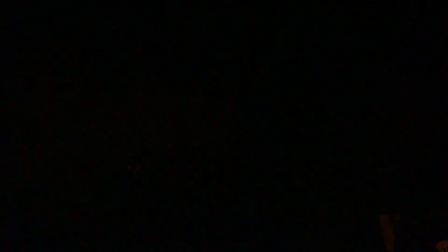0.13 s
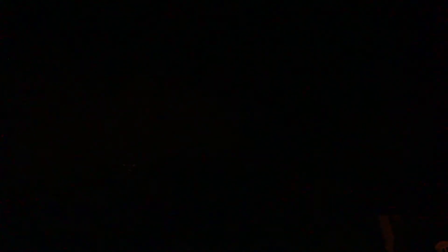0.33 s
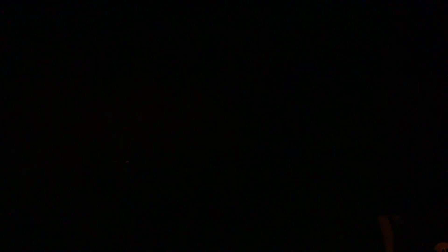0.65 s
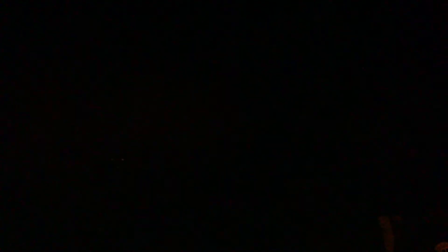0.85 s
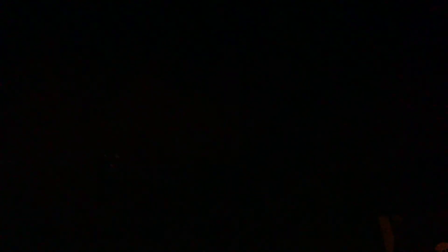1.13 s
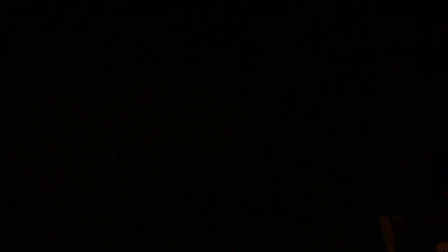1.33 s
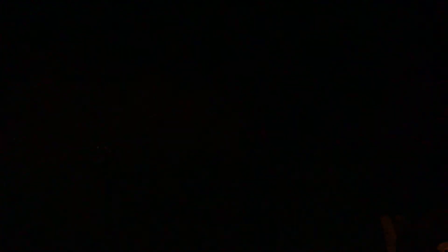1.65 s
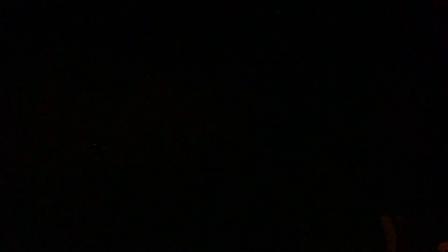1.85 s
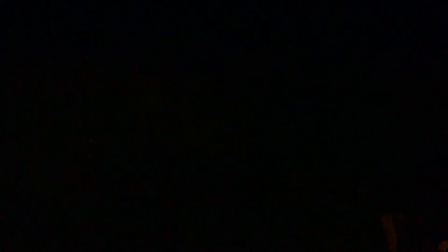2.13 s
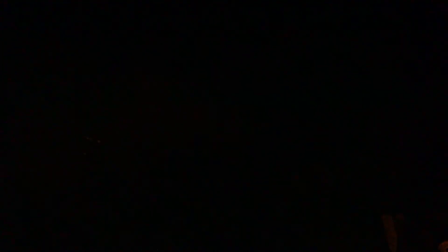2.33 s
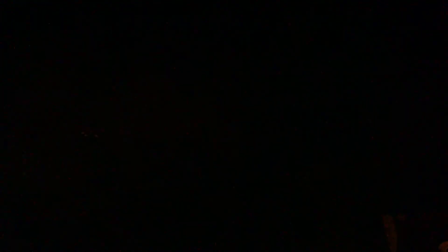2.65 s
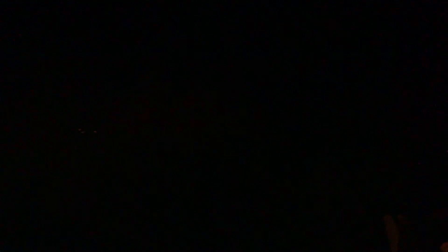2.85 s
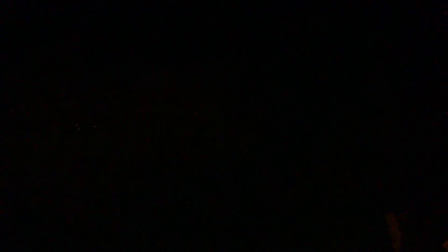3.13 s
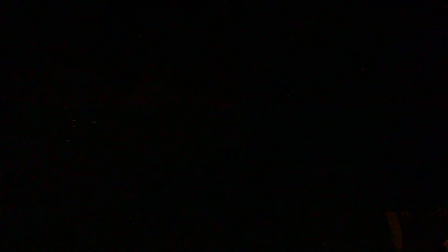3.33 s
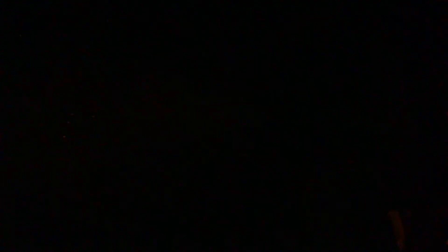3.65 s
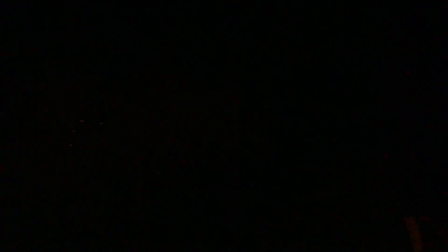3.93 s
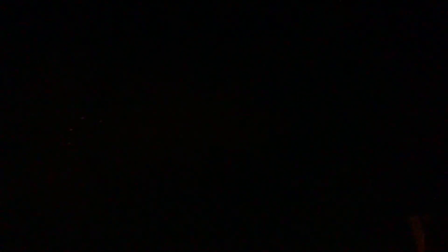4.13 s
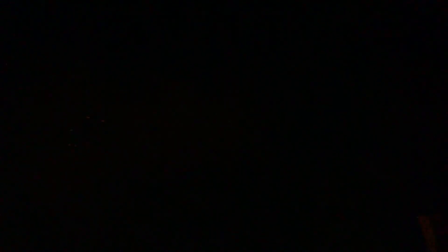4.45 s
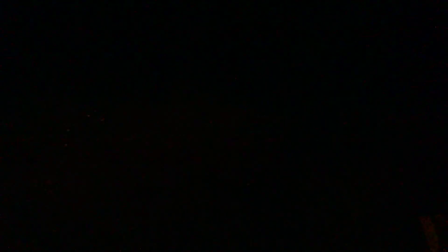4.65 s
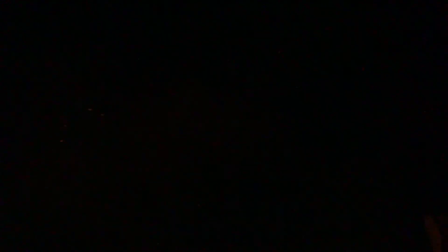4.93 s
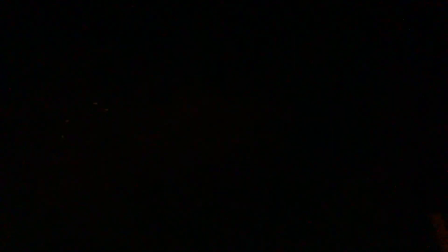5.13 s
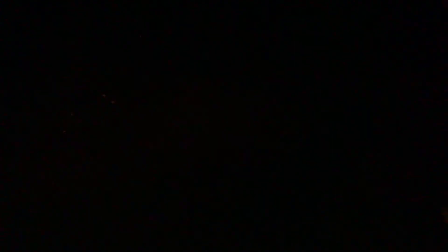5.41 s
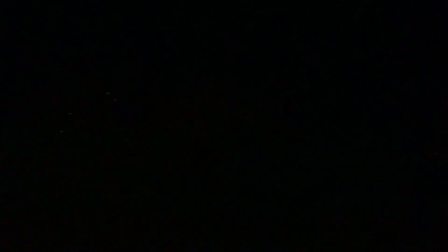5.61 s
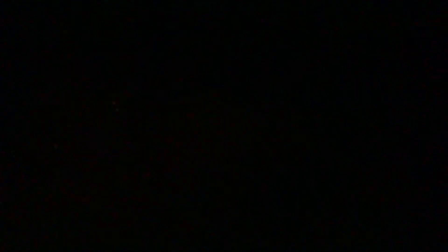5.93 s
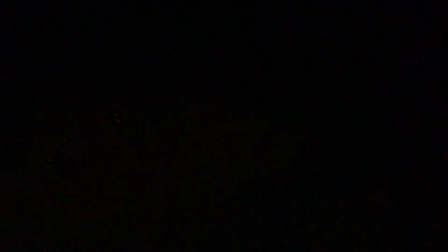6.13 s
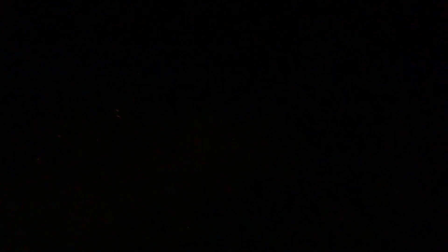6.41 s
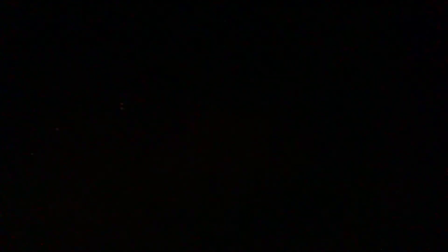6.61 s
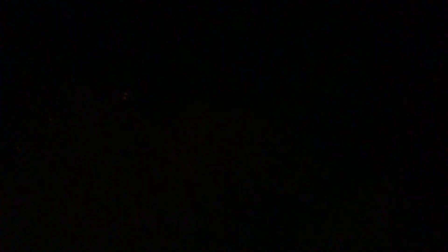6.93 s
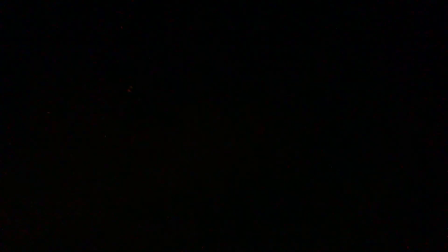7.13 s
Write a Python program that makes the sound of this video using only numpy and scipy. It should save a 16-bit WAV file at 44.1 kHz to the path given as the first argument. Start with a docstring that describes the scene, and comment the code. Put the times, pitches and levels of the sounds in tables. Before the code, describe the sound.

A dense gull flock is already calling at 0 s and never stops until the cut at about 7.4 s. Near birds give short mews, yelps and keening cries, roughly 0.05 to 0.25 s long, many scooping up slightly and then falling; lower nasal honks and gruff notes and hoarse pulsed squawks cut between them. Behind is a dulled, uneven clamour of far birds, with a diffuse echo from house fronts lasting over half a second. A soft town hum with microphone hiss stays beneath; a treble hiss swells around 0.5 s. Strong keening cries stand out near 3.2, 3.7, 4.2 and 4.9 s. A low finger thump on the phone comes at 3.1 s, toward the right, then small plastic ticks at 3.8, 4.4, 5.2, 5.3 and 5.9 s. Busy bursts of calls come around 6.1 to 6.3 and 6.75 s, then a last mew at 7.1 s.

```python
"""A flock of gulls calls at night over the roofs of a seaside town, heard by a hand-held phone with two ports.
From the start a filtered-noise hum of the town lies under a clamour of far birds, summed from many short cries;
near birds give falling harmonic cries and hoarse pulsed squawks, and house fronts echo them as decaying noise.
At half a second a hiss swells once; after three seconds a finger thumps the case, a few low decaying cycles;
then the case ticks a few times, short noise cracks through its resonances, while the birds call on."""
import sys
import numpy as np
from scipy import signal
from scipy.fft import rfft, irfft
from scipy.io import wavfile
from scipy.ndimage import uniform_filter1d

SR = 44100
rng = np.random.default_rng(int(sys.argv[2]) if len(sys.argv) > 2 else 0)


def int16_out(signal):
    """Quantize to a 16-bit WAV file."""
    q = np.round(np.clip(np.atleast_2d(signal).T, -1, 1) * 32767)
    wavfile.write(sys.argv[1], SR, q.astype(np.int16))


N = 320607  # length in samples
TOP_HZ = 12800  # the phone cuts off above this


def undb(db):
    """Level law: decibels become an amplitude ratio."""
    return 10 ** (np.asarray(db) / 20)


def level(x, db):
    """Effective value: scales a sound to an rms level in dB."""
    return x * undb(db) / np.sqrt(np.mean(x ** 2))


def band(x, hz, width):
    """Resonance: a two-pole filter with gain 1 at its centre."""
    return signal.lfilter(*signal.iirpeak(hz, hz / width, SR), x)


def walk(rate, size):
    """Slow random fluctuation: levels drawn `rate` times a second, joined by slopes, spread near 1."""
    hold = max(int(SR / rate), 1)
    steps = np.repeat(rng.standard_normal(size // hold + 1), hold)
    return 1.2 * uniform_filter1d(steps, hold)[:size]


def add(out, x, start_s, pan_db, lag_ms):
    """Level and time difference between ports: the left gains pan_db and hears lag_ms later, within 2 %."""
    for port, sign in ((0, 0.96), (1, -1)):
        at = max(int(round((start_s + sign * lag_ms / 2000) * SR)), 0)
        part = x[:max(N - at, 0)]
        out[port, at:at + len(part)] += part * undb(sign * pan_db / 2)


# spectrum of the town's hum. Each row: frequency in Hz, relative density in dB per Hz
TOWN_SPECTRUM = [(15, -67), (25, -37), (95, -17.5), (230, -9.5), (367, -13), (763, -13.5), (991, -12),
                 (1160, -17.5), (1320, -5.5), (1580, -14.5), (2000, -17.5), (2670, -18), (4500, -25.5),
                 (10600, -29.5), (12800, -32), (16600, -75.5), (22000, -120)]
TOWN_DB = -47.5  # rms, before the ports are set 1 dB apart


def town(flicker_db=0.5):
    """Shaped noise: distant traffic and sea with microphone hiss; four bands flicker independently."""
    hz = np.fft.rfftfreq(N, 1 / SR)
    corner_hz, corner_db = np.transpose(TOWN_SPECTRUM)
    shape = undb(np.interp(np.log(hz + 1), np.log(corner_hz), corner_db))
    hum = 0
    for low, high in ((0, 300), (300, 1500), (1500, 5000), (5000, SR)):
        in_band = (hz >= low) * (hz < high)
        part = irfft(rfft(rng.standard_normal((2, N))) * shape * in_band, N)
        hum = hum + part * undb(flicker_db * walk(7.2, N))
    return level(hum, TOWN_DB) * undb([[-.5], [.5]])


SWELL_PEAK_S, SWELL_WIDTH_S = 0.51, .22
SWELL_HISS_DB, SWELL_LOW_HZ = -52.5, 4500  # rms at the peak, lower edge of the hiss


def hiss_swell():
    """High-passed noise under a Gaussian envelope: a broad treble hiss rises and sinks once."""
    highpass = signal.butter(2, SWELL_LOW_HZ, "high", fs=SR)
    hiss = signal.lfilter(*highpass, rng.standard_normal((2, N)))
    from_peak = (np.arange(N) / SR - SWELL_PEAK_S) / SWELL_WIDTH_S
    return level(hiss, SWELL_HISS_DB) * np.exp(-.5 * from_peak ** 2)


# thumps on the case. Each row: start in seconds, nominal level in dB, frequency in Hz,
# left minus right in dB
THUMPS = [(3.105, -60, 50, -7), (3.113, -37, 116, -11), (3.138, -40, 138, -11), (3.16, -43, 94.5, -12)]


def case_thumps(thump_s=0.013):
    """Damped low oscillation: a finger's thump shakes the two ports in opposite senses."""
    shake, t = np.zeros((2, N)), np.arange(int(.06 * SR)) / SR
    envelope = t / thump_s * np.exp(1 - (t / thump_s) ** 2)
    for start_s, db, hz, pan_db in THUMPS:
        add(shake, undb(db) * np.sin(2 * np.pi * hz * t) * envelope, start_s, pan_db, 0)
    return shake * [[1], [-1]]


# ticks of the case. Each row: start in seconds, peak in dB before panning, left minus right in dB,
# brightness in dB per octave
TICKS = [(3.8275, -22, 5, -5), (4.3994, -38, 1.0, 0), (5.1895, -34, 2, -15), (5.282, -17.5, -9, 5),
         (5.882, -26, -12.5, -7.5), (5.903, -22.5, -13.5, 0)]
# resonances of the plastic case. Each row: frequency in Hz, width in Hz, gain in dB before brightness
CASE_RESONANCES = [(756, 320, -8.5), (3170, 310, 10), (4240, 400, 9.5), (5800, 400, 8), (9700, 3500, -55)]


def case_ticks(crack_s=0.0018):
    """Impulse excitation: short noise cracks ring the resonances of the plastic case."""
    out, t = np.zeros((2, N)), np.arange(int(.06 * SR)) / SR
    for start_s, db, pan_db, bright_db in TICKS:
        crack = rng.standard_normal(len(t)) * np.exp(-t / crack_s)
        ring = sum(undb(gain_db + bright_db * np.log2(hz / 3000)) * band(crack, hz, width)
                   for hz, width, gain_db in CASE_RESONANCES)
        add(out, ring / np.abs(ring).max() * undb(db), start_s, pan_db, -.1)
    return out


ECHO_T60_S, ECHO_DB, ECHO_DAMP_HZ = 0.69, -7, 6200  # ECHO_DB is for the near birds


def fronts(x):
    """Diffuse reflection: house fronts return a dulled, decaying noise tail, different at each port."""
    t = np.arange(int(1.2 * SR)) / SR
    noise = rng.standard_normal((2, len(t))) * (t > .012)  # the first reflection comes after 12 ms
    decay = np.exp(-np.log(1000) * t / ECHO_T60_S)
    tail = signal.lfilter(*signal.butter(1, ECHO_DAMP_HZ, fs=SR), noise) * decay
    tail /= np.sqrt(np.sum((noise * decay) ** 2) / 2)
    return signal.fftconvolve(x.mean(axis=0, keepdims=True), tail, axes=1)[:, :N]


def cry(length, hz, db, harmonics_db, waver, flutter_db=1.3, edge_s=.011, closing_db=1.5, rasp=.15):
    """Harmonic series: the syrinx sings a stack of partials; pitch wavers (%), each partial flutters."""
    size = int(length * SR)
    u = np.linspace(0, 1, size)
    glide = uniform_filter1d(np.interp(u, np.linspace(0, 1, len(hz)), hz), size // 12)
    phase = 2 * np.pi * np.cumsum(glide * (1 + waver / 100 * walk(150, size))) / SR
    # the beak closes during the cry, so the sound darkens from start to end
    darker_db = closing_db * (1 - 2 * u) * hz[0] / 1000
    stack = 0
    for k, harmonic_db in enumerate(harmonics_db):
        if (k + 1) * max(hz) < TOP_HZ:
            # higher harmonics flutter more and lie lower
            flutter = flutter_db * np.sqrt(k + 1) * (walk(70, size) - np.sqrt(k))
            gain = undb(harmonic_db + (k - .5) * darker_db + flutter)
            stack = stack + gain * np.sin((k + 1) * phase + k)
    stack *= 1 + rasp * walk(900, size)  # uneven airflow spreads a haze round each harmonic
    edges = np.clip(np.minimum(u, 1 - u) * length / edge_s, 0, 1)
    return np.sqrt(2) * stack * edges * undb(np.interp(u, np.linspace(0, 1, len(db)), db))


# spectrum of a far voice. Each entry: relative level of a harmonic in dB, from the first up
FAR_HARMONICS_DB = [-1, -5.5, -6.5, -14, -13]
# spectrum of a deep far voice, weak in its first harmonic. Each entry: as above
DEEP_HARMONICS_DB = [-15.5, 6, -16, -5, -28, -29, 2]


def far_gulls(count=180, low_hz=930, octaves=.8, fall=0.2035, spread_db=0.5):
    """Superposition: many short, hoarse falling cries from random places add up to a clamour."""
    out = np.zeros((2, N))
    for when, high, long, loud, side, drop in rng.random((count, 6)):
        bend = 1 - fall * drop * np.array([-0.1875, -.3, .1, 1])
        hz = low_hz * 2 ** (octaves * high) * bend
        harmonics_db = FAR_HARMONICS_DB
        if high < .25:  # the lowest birds sing an octave deeper
            hz, harmonics_db = hz / 2, DEEP_HARMONICS_DB
        db = spread_db * (2 * loud - 1) + np.array([-4, 0, -1, -6])
        voice = cry(.05 + .09 * long, hz, db, harmonics_db, waver=.8)
        add(out, voice, when * N / SR, 6 * (side - .5), 0.4 * (side - .5))
    return level(out, 0)


# rise and fall of the far clamour. Each row: time in seconds, level in dB
CLAMOUR_LEVELS = [(0.0, -41), (.2, -47.5), (.42, -38), (.55, -38.5), (.77, -40.5), (.95, -42), (1.1, -58.5),
                  (1.43, -40.5), (1.65, -42.5), (2.15, -39), (2.41, -44.5), (2.8, -36), (3.2, -40.5),
                  (3.34, -34), (3.48, -41), (3.7, -40), (4.3, -37), (4.45, -40), (4.65, -38), (5.34, -40.5),
                  (5.57, -34.5), (5.8, -48.5), (6.05, -49.5), (6.28, -33), (6.5, -48.5), (6.7, -40),
                  (6.84, -30.5), (7.15, -66), (7.27, -46)]
FAR_DULL_HZ = 3640  # distance takes the treble off the far birds


def far_clamour():
    """Absorption over distance: far cries lose treble, blur in the echo and vary in level."""
    far = signal.lfilter(*signal.butter(2, FAR_DULL_HZ, fs=SR), far_gulls())
    blurred = level(far + 1.06 * fronts(far), 0)
    time_s, db = np.transpose(CLAMOUR_LEVELS)
    return blurred * undb(np.interp(np.arange(N) / SR, time_s, db))


# hoarse squawks. Each row: start in seconds, length in seconds, starting level near 2 kHz in dB,
# first pulse rate in Hz, last pulse rate in Hz, brightness in dB per octave, left minus right in dB
SQUAWKS = [(.17, 0.066, -50, 497, 471, -1.5, 6), (.395, 0.051, -47.5, 485, 445, -6, 5),
           (2.185, 0.098, -45, 608.4, 623, -2.5, 8.5), (2.301, 0.091, -47, 658, 489, -1, 4.5),
           (2.43, 0.054, -46.5, 468, 467, -6, 6), (2.561, 0.19, -46, 596, 612, -3, 4.5),
           (2.98, 0.15, -49.5, 490, 495.4, 0.5, 1.5), (4.06, 0.1, -43.5, 640.5, 537, 1, 4.5),
           (4.3, 0.21, -45.5, 470, 548, -1, 4), (4.701, .11, -47.5, 599, 556.6, -0.5, 6.5),
           (5.385, 0.15, -39.5, 538.3, 622, 1, 3), (5.51, 0.13, -52, 687, 655, 3, 7),
           (6.08, .045, -38, 560.4, 617, 2, 2), (6.74, .17, -41, 561.3, 618.6, 2.5, 4.5),
           (6.9, 0.089, -54.5, 544, 490, 5, 5.5), (7.095, .045, -46, 474, 457, -4, 4)]
# resonances of the throat. Each row: frequency in Hz, width in Hz, relative gain in dB before brightness
THROAT = [(1076, 380, 2), (1440, 294, 2.5), (1740, 320, 4), (2850, 700, -0.5), (3660, 460, 4),
          (5020, 2600, -13.5)]
SQUAWK_GROWS_DB = 3.5  # level gained from start to end of a squawk


def squawks(jitter=.06, scatter_db=2.5, breath=.3):
    """Source and filter: uneven pulses and a rasp of air ring the throat, tilted by brightness."""
    out = np.zeros((2, N))
    for start_s, length, db, first_hz, last_hz, bright_db, pan_db in SQUAWKS:
        t = np.arange(0, length, 1 / SR)
        rate_hz = first_hz + (last_hz - first_hz) * t / length
        turns = np.floor(np.cumsum(rate_hz * (1 + jitter * walk(200, len(t)))) / SR)
        pulses = np.diff(turns, prepend=0) * undb(scatter_db * rng.standard_normal(len(t)))
        air = level(pulses, 0) + breath * rng.standard_normal(len(t))
        # neighbouring resonances have opposite polarity
        throat = sum((-1) ** k * undb(gain_db + bright_db * np.log2(hz / 2000)) * band(air, hz, width)
                     for k, (hz, width, gain_db) in enumerate(THROAT))
        throat /= np.std(band(throat, 2000, 700))
        edges = np.clip(np.minimum(t, (length - t) / 2) / .02, 0, 1)  # 20 ms in, 40 ms out
        growth = undb(db + SQUAWK_GROWS_DB * t / length)
        add(out, throat * edges * growth, start_s, pan_db, -.11)
    return out


# clear cries. Each row: start in seconds, length in seconds, held pitch in Hz, end pitch in Hz,
# release of the pitch as a share of length (0-1), peak of the swell in dB, its place as a share of length (0-1),
# voice, brightness in dB per harmonic, left minus right in dB, lag of the left in ms
CRIES = [(0, 0.2, 472.3, 441.5, 0.34, -36.5, 0, "nasal", 0.5, 2, -0.13),
         (0.029, 0.16, 1415, 1189, 0.25, -27.5, 0.27, "mew", -3.5, -1, 0.043),
         (0.164, .16, 1640, 1343, 0.43, -38.5, .7, "yelp", 4.5, 1, -0.13),
         (0.174, 0.069, 1837, 1880, 0.45, -42, 0.34, "plain", -3, 10, -0.18),
         (.179, .11, 1403, 1326, 0.33, -38.5, 0.03, "plain", 1, 7, -0.21),
         (0.258, 0.12, 1630, 1288, 0.5, -31.5, 0.58, "yelp", 0, -1, -.22),
         (0.382, 0.057, 1114, 914, 0.02, -36.5, 0.97, "plain", -15, -1, .01),
         (0.572, 0.19, 1360, 1180, 0.47, -32.5, 0.5, "keen", 0, 0.5, 0.07),
         (0.6, 0.048, 1710, 1600, 0.24, -34, .5, "yelp", -3, 4, -0.16),
         (0.617, 0.078, 940, 950, .5, -44.5, .5, "plain", -1, 3, -.05),
         (0.684, 0.058, 1384, 1370, .5, -35, 0.6, "mew", -2.5, 3, -.18),
         (.698, .086, 880, 937, 0.15, -36, 0.58, "plain", 2, 2, -.094),
         (0.783, 0.057, 1350, 1360, .5, -39.5, 0.1, "plain", 3, 8, 0.16),
         (.787, 0.27, 952, 987, 0.43, -38, 0.17, "plain", -2, 0, 0.015),
         (0.81, 0.12, 1700, 1347, 0.25, -35.5, 0.63, "yelp", -4, 3, 0.08),
         (.955, 0.072, 1497, 1457, 0.44, -49.5, 0.3, "yelp", 6, 9, -0.013),
         (1.0, .055, 986, 890, 0.23, -41, 0.1, "plain", -4, 1, .01),
         (1.152, 0.089, 1843, 1750, 0.14, -46, .8, "thin", -2, 3, 0.16),
         (1.207, 0.084, 1642, 1643, 0.6, -41, 0.65, "yelp", 1, 7, -0.1),
         (1.242, 0.083, 1000, 1110, 0.35, -38, 0.14, "plain", -3, -4, 0.033),
         (1.278, 0.21, 1297, 1181, 0.27, -36, 0.61, "mew", 0.5, 2.5, -0.089),
         (1.355, 0.082, 1587, 1314, 0.13, -33, 1, "mew", 0, -1, 0.13),
         (1.362, 0.14, 1021, 890, 0.07, -36, 0.22, "plain", -8, 1, .06),
         (1.481, .073, 464.5, 464, 0.6, -45.5, 0.7, "nasal", 0, 1, 0.1),
         (1.51, .045, 1635, 1520, 0.38, -45, .4, "plain", 2, 6, -.1),
         (1.554, 0.24, 558.5, 525.6, .44, -37, 0.51, "gruff", 0, 5.5, 0.042),
         (1.715, 0.11, 1697, 1350, 0.02, -35, 0.62, "yelp", -4.5, 2, 0.085),
         (1.85, 0.15, 1320, 1262, 0.24, -48, 0.47, "mew", 3, 7, -0.086),
         (1.96, 0.054, 1760, 1745, .5, -48, .4, "plain", 0, -3, .18),
         (1.995, 0.057, 1040, 1070, 0.6, -37, 0.46, "plain", 1.5, -3, .091),
         (2.034, 0.2, 1307, 1160, 0.58, -32.5, 0.6, "keen", 0.5, 0, -0.059),
         (2.053, 0.1, 993, 930, 0.37, -36, 0.3, "plain", -5, 0, .096),
         (2.2, 0.062, 1895, 1850, 0.46, -33.5, 0.75, "plain", -7, 4, -.18),
         (2.249, 0.06, 1570, 1690, 0.4, -40, 0.46, "plain", 3, 4, -0.078),
         (2.3, 0.1, 1518, 1140, 0.03, -40.5, 0.2, "plain", 2.5, 4, -0.063),
         (2.426, 0.06, 877, 920, 0.66, -40, 0.83, "thin", -4, 4, -0.16),
         (2.603, .086, 675, 632, 0.48, -30.5, 0.6, "honk", 0, 0, 0.058),
         (2.682, 0.17, 1116, 953, 0.18, -32, 0.52, "brassy", 0, 4, 0.12),
         (2.885, 0.2, 1720, 1630, 0.29, -40, 0.46, "plain", -3, -5.5, .12),
         (2.954, 0.097, 1700, 1355, 0.13, -42.5, .4, "yelp", -4, 2, .05),
         (2.983, 0.063, 1417, 1340, 0.52, -39, 0, "plain", -3, 10, 0.03),
         (3.063, 0.052, 1472, 1310, 0.33, -38, 0.15, "plain", 3, 10, 0.065),
         (3.115, 0.06, 1005, 1010, .5, -41, 0.1, "plain", -9, 7, .078),
         (3.192, 0.07, 520, 478, .25, -42.5, 0.1, "deep", -2, 5, -0.044),
         (3.21, 0.14, 1144, 1023, 0.3, -44.5, 0.43, "bright", -3.5, 14, 0.3),
         (3.217, .18, 1400, 1204, .35, -28, 0.63, "keen", 1, -2, -0.055),
         (3.313, 0.055, 1373, 1395, 0.35, -33, .3, "plain", 2, -2, -.16),
         (3.359, .063, 1269, 1319, 0.27, -36.5, 0.2, "plain", -1, 6, -0.2),
         (3.387, 0.049, 1000, 960, .5, -35.5, 0.5, "plain", -4, 1, .075),
         (3.463, .079, 1400, 1516, 0.09, -36.5, 0.98, "plain", -4, 0, -0.01),
         (3.582, 0.06, 1278, 1375, 0.48, -38.5, 0.56, "plain", 4, 1, 0.054),
         (3.624, 0.095, 1704, 1405, 0.03, -37.5, .2, "mew", -2.5, 3.5, -0.09),
         (3.702, .18, 1405, 1244, 0.24, -26, 0.64, "keen", .5, .5, -0.059),
         (3.704, 0.053, 1347, 1290, 0.5, -38, .1, "mew", -2, 9, -0.22),
         (3.825, 0.14, 1146, 1027, 0.6, -38.5, 0.57, "brassy", 1.5, 5.5, 0.091),
         (3.832, 0.097, 1346, 1370, 0.64, -41, 0.8, "mew", 3.5, 2, -0.22),
         (3.992, 0.073, 1199, 1066, 0.14, -37, 0.2, "shrill", 0.5, 5.5, -0.065),
         (4.068, 0.12, 1813, 1415, 0.2, -37.5, 0.8, "yelp", 1.5, 0, -.042),
         (4.075, 0.045, 1264, 1170, 0.8, -36, 0.2, "plain", 3, 12, 0.23),
         (4.206, .047, 1060, 950, 0.16, -42, 0.6, "plain", 5.5, -1, 0.065),
         (4.232, 0.18, 1392, 1199, 0.54, -25.5, 0.63, "keen", -1.5, -2, -0.078),
         (4.294, 0.12, 1823, 1825, .2, -38.5, 0.58, "plain", 1.5, 5, -0.18),
         (4.314, .044, 783, 770, .7, -39, 1, "deep", -1.5, 1, -.12),
         (4.375, 0.063, 1357, 1257, 0.09, -27, 0.5, "mew", -2, 2.5, -0.21),
         (4.388, .222, 1126, 1023, .05, -35.5, 0.4, "plain", 3, 4.5, -0.27),
         (4.606, .052, 1400, 1491, 0.46, -43, 0.77, "plain", 1, -1, -0.076),
         (4.786, 0.14, 1206, 1203, 0.45, -31.5, 0.48, "shrill", 0, 8, -0.037),
         (4.845, 0.052, 1830, 1767, 0.4, -42, .7, "bright", -4, -1, -.01),
         (4.872, 0.16, 1390, 1255, 0.18, -23.5, 0.58, "keen", -1.5, -1, -0.096),
         (4.929, 0.076, 1382, 1350, 0.24, -38, .33, "mew", -0.5, -6, 0.16),
         (4.97, .087, 1730, 1650, .5, -42.5, 0.6, "plain", 1, 2, -0.12),
         (4.978, 0.15, 1146, 1165, 0.5, -35, 0.44, "bright", 1, 8.5, 0.24),
         (5.188, 0.12, 535, 512.3, 0.49, -34.5, 0.68, "gruff", .5, 4, -0.0018),
         (5.246, 0.054, 1736, 1697, 0.4, -43, 0.2, "yelp", 7, 10, .085),
         (5.287, .11, 1537, 1327, 0.03, -35, 0.03, "plain", 2, 0, 0.053),
         (5.401, 0.053, 562, 550, .5, -45, 0.1, "deep", -2, 2, -.2),
         (5.411, 0.11, 1828, 1890, 0.62, -39.5, 0.3, "plain", 0, 14, 0.076),
         (5.416, 0.11, 1310, 1210, 0.04, -30, .55, "mew", 0.5, 6, -.15),
         (5.488, 0.17, 1356, 1186, 0.66, -25, 0.41, "mew", 1, 2, -0.078),
         (5.521, 0.11, 1157, 1045, 0.42, -34.5, 0.2, "bright", 1, 4, -0.026),
         (5.591, .067, 1385, 1270, .1, -33, 0.3, "thin", 5, -2, -.18),
         (5.685, 0.051, 1039, 1003, 0.05, -39.5, 0.77, "plain", 0, 5, -.086),
         (5.711, 0.14, 1350, 1345, .3, -48, 0.9, "mew", -1.5, 7, -0.18),
         (5.896, .14, 1340, 1290, 0.2, -45, 0.7, "mew", 4, 4.5, .14),
         (5.932, 0.063, 454, 438, 0.3, -43.5, 0.3, "deep", -0.5, 2, -.1),
         (6.095, 0.1, 1253, 1146, 0.31, -26, 0.43, "bright", 1, 7, 0.15),
         (6.143, .12, 1085, 1134, 0.27, -30.5, .6, "shrill", 0.5, 2, -0.12),
         (6.211, .18, 1344, 1182, 0.44, -26.5, .45, "mew", -1.5, 7, -.12),
         (6.25, 0.078, 1805, 1785, 0.59, -42, 0.73, "mew", 4, 2, 0.21),
         (6.316, 0.078, 1338, 1349, .4, -43, 0.2, "mew", 3, -7, 0.23),
         (6.379, 0.12, 555.6, 468, .4, -34.5, .45, "deep", 0, 9, 0.22),
         (6.398, 0.038, 1226, 1230, .3, -41, .2, "plain", 2, 11, -.03),
         (6.51, 0.11, 1235, 1128, 0.27, -43, 0.01, "bright", -2.5, 4, -0.11),
         (6.624, 0.064, 1340, 1300, 0.6, -40.5, 0.04, "plain", 1.5, 11, 0.2),
         (6.645, .097, 1796, 1400, 0.28, -36, 0.55, "yelp", 1.5, -1, 0.1),
         (6.699, 0.057, 659, 680, 0.4, -37, 0.65, "honk", -2, 11, -0.23),
         (6.748, 0.037, 1215, 1192, .7, -28, 0.2, "bright", -0.5, 0, -0.14),
         (6.749, 0.093, 1943, 1834, 0.3, -30, 0.47, "plain", 0, 6.5, -0.21),
         (6.754, .19, 1374, 967.5, 0.14, -27.5, 0.16, "plain", 0, 5, -0.17),
         (6.773, 0.088, 1650, 1520, 0.06, -32.5, 0.42, "thin", 5.5, -2, .21),
         (6.811, 0.042, 1450, 1430, .5, -37.5, .4, "bright", 3.5, 3, -.15),
         (6.936, 0.056, 1001, 920, 0.44, -34, .6, "plain", -11, 2, -0.11),
         (7.075, 0.064, 468.2, 447, 0.3, -36, 0.52, "nasal", 2, 2, -0.067),
         (7.117, 0.19, 1260, 1220, 0.55, -32.5, 0.58, "mew", -2.5, 10.5, 0.14),
         (7.248, .028, 1115, 1131, .5, -39, .9, "bright", 2.5, -5, .01)]
# spectra of the voices. Each row: relative levels of harmonics 1-6 in dB, before brightness
VOICES = {"mew": [-1, -2, -12, -19, -39, -46], "plain": [0.5, -10, -21.5, -28, -50, -40.5], "bright": [-6,
          -6.5, -1.5, -14, -20.5, -31.5], "deep": [-22.5, -11, -3.5, -4.5, -1, -11.5], "nasal": [-32, 3,
          -11, -25, -20, -17.5], "thin": [-31, 1, -33, -31, -41, -52], "yelp": [-2.5, -5, -21, -35, -56,
          -55], "brassy": [-2, -10.5, -6, -6, -19, -42], "keen": [-5.5, -1, -15.5, -22, -50, -56], "honk":
          [-36, -2.5, -13, -4.5, -1.5, -14], "shrill": [-10.5, -8.5, -2, -7.5, -13.5, -24.5], "gruff": [-20,
          -9.5, -7.5, -8, -4.5, -10]}
# pitch bends of the voices. Each row: start below the held pitch as a share of it, arrival there as a
# share of length (0-1), curve of the slide (over 1 drops late, under 1 drops early)
BENDS = {"mew": (.015, 0.22, 1.3), "plain": (0.016, 0.21, .9), "bright": (0.0363, .3, 1.13),
         "deep": (0.0585, 0.351, 1.6), "nasal": (0.0447, 0.273, 1.21), "thin": (.005, .2, 0.91),
         "yelp": (.01, 0.14, .45), "brassy": (0.019, 0.18, 1.2), "keen": (0.014, 0.16, 1.38),
         "gruff": (.14, .44, .2), "honk": (0.017, 0.57, 1.03), "shrill": (0.0094, 0.19, 1.22)}
# swells of the voices. Each row: dB lost one whole length before the peak, dB lost one whole length after
SWELLS = {"mew": (11.3, 13.5), "keen": (13.4, 26.4), "plain": (10.4, 13.6), "bright": (14.5, 10),
          "deep": (8.4, 10), "gruff": (20.6, 3), "honk": (8.9, 12), "shrill": (17, 27), "nasal": (11, 14),
          "thin": (12, 11), "yelp": (10.6, 11), "brassy": (15, 14)}
WAVER_PERCENT = 0.54


def near_gulls(fall_db=4.5):
    """Frequency and amplitude glide: a cry scoops up, holds, slides to its end; it swells once and fades."""
    out, u = np.zeros((2, N)), np.linspace(0, 1, 17)
    for start_s, length, hz, end_hz, hold, db, peak, voice, bright_db, pan_db, lag_ms in CRIES:
        scoop, reached, curve = BENDS[voice]
        below = scoop * np.clip(1 - u / reached, 0, 1)
        slide = np.clip((u - hold) / max(1 - hold, .05), 0, 1) ** curve
        pitch = hz * (1 - below) + (end_hz - hz) * slide
        rise_db, sink_db = SWELLS[voice]
        swell_db = db - np.where(u < peak, rise_db * (peak - u), sink_db * (u - peak))
        lower = np.array(VOICES[voice]) + bright_db * np.arange(6)
        lower += max(VOICES[voice]) - lower.max()  # brightness leaves the strongest level unchanged
        upper = [lower[-1] - fall_db * k for k in (0, 0, 1, 2, 3)]  # harmonics 7-11
        voiced = cry(length, pitch, swell_db, list(lower) + upper, WAVER_PERCENT)
        add(out, voiced, start_s, pan_db, lag_ms)
    return out


def scene():
    """Superposition: town, hiss, case, far clamour and the near birds with their echo."""
    background = town() + hiss_swell()
    case = case_thumps() + case_ticks()
    far = far_clamour()
    near = squawks() + near_gulls()
    return background + case + far + near + undb(ECHO_DB) * fronts(near)


def record(dry):
    """Band limiting: microphones dull the highest treble and lose the deepest bass; the phone cuts the top."""
    dull = signal.lfilter(*signal.butter(2, 10500, fs=SR), dry)
    thin = signal.lfilter(*signal.butter(2, 45, "high", fs=SR), dull)
    return signal.sosfilt(signal.ellip(10, .2, 70, TOP_HZ, fs=SR, output="sos"), thin)


dry = scene()
out = record(dry)
int16_out(out)
```